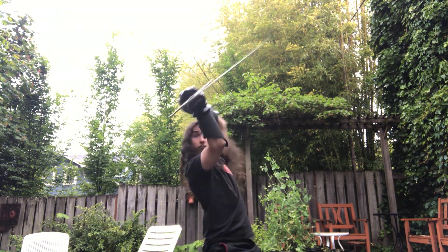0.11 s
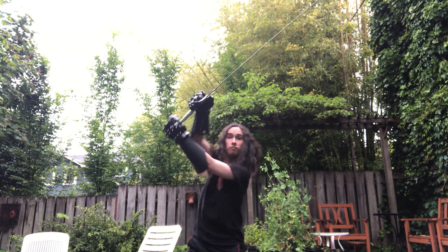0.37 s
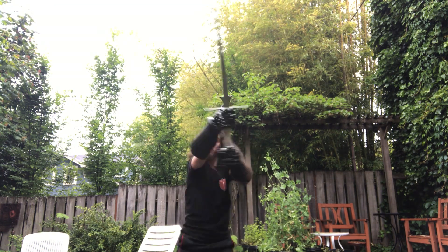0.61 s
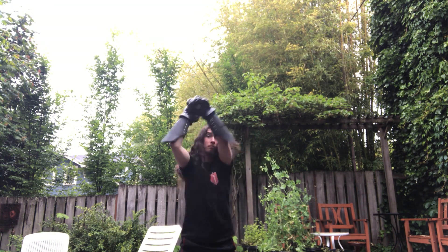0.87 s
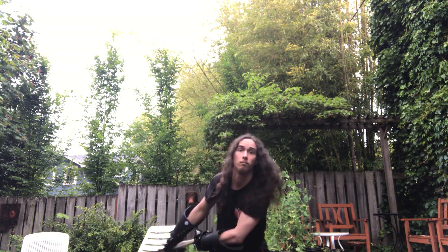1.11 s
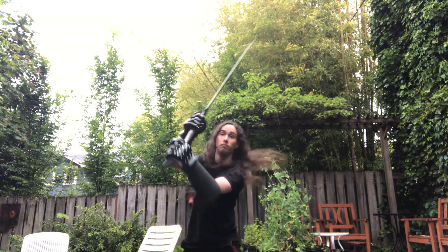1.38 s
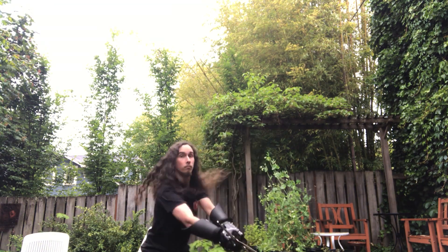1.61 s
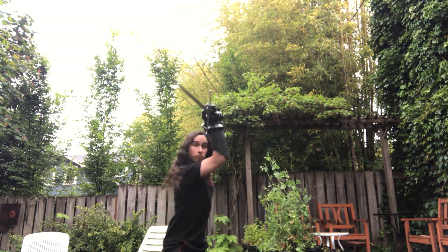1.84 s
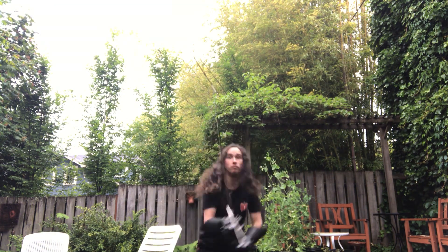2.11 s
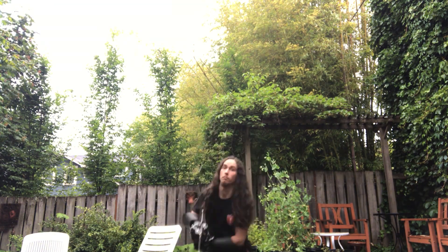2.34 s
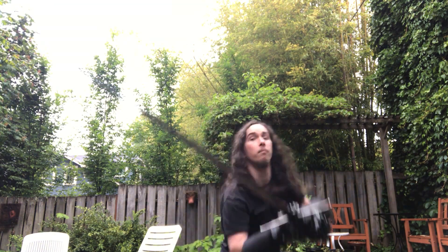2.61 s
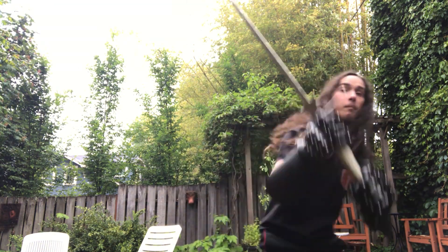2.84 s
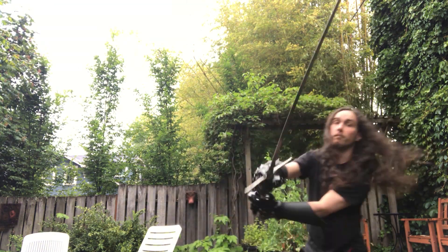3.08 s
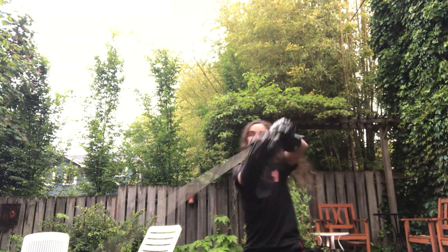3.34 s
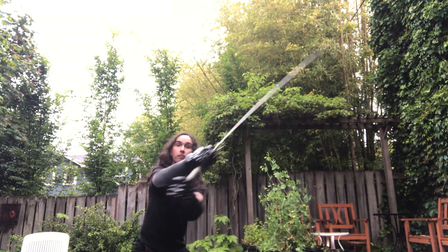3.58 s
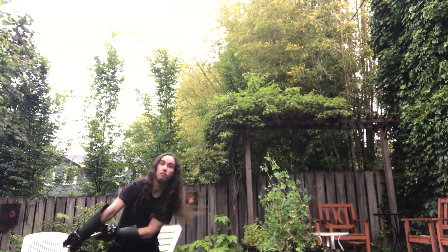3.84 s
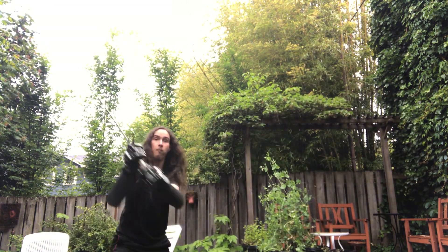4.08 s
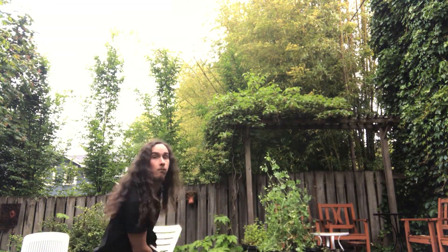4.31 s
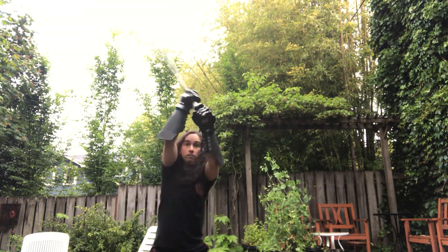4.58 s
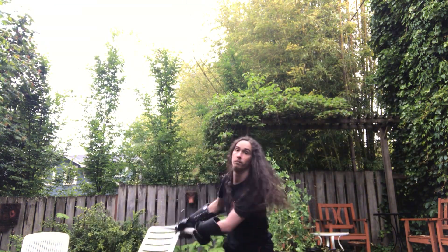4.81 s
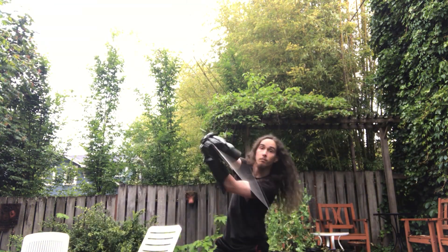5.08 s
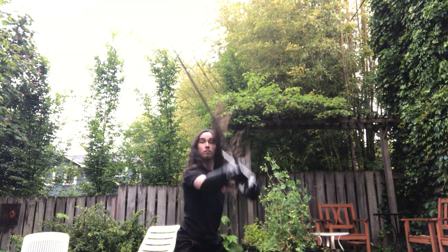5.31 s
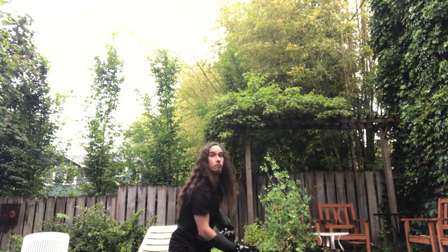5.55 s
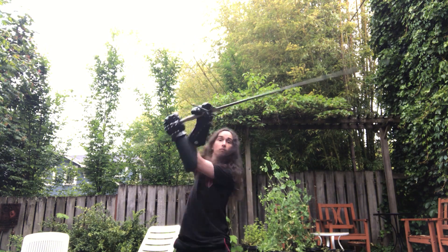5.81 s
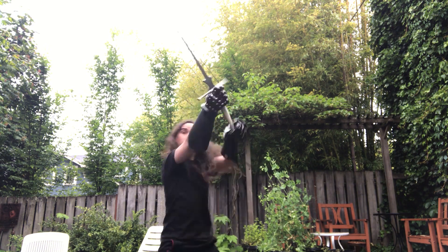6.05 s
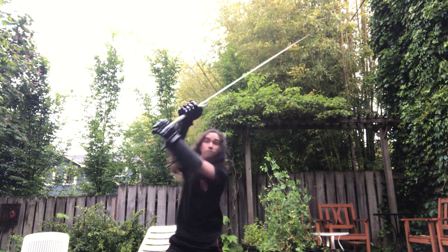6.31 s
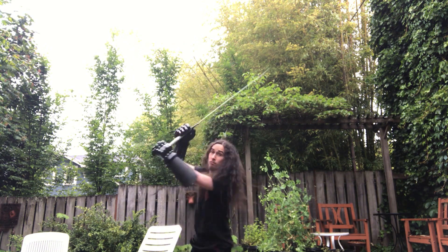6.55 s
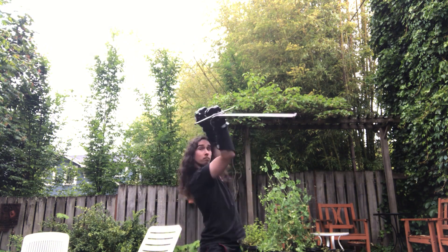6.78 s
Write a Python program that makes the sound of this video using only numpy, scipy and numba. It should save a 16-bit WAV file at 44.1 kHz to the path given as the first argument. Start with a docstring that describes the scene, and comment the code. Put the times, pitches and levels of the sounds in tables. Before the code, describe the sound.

Hard plated gloves clack and scrape in quick irregular bursts while feet crunch on gravel in a backyard, with faint distant town noise behind.

```python
"""Feet shuffle and crunch on gravel, with plates scraping and clacking, two metres from a phone, for 7 s.
From the start, swarms of tiny damped clicks crunch and scrape, with single plate snaps (short rings)
and hollow two-tone knocks. The hardest snap comes at 2.7 s, a dense run of snaps at
3.2-3.6 s, the loudest scrape with a knock at 5.9 s, a last clack at 6.8 s. Ground and fences echo
briefly; throughout lies a distant town of flickering noise, with faint sine hums from 2.1, 3.9, 5.9 s."""
import sys
import numpy as np
from scipy import signal
from scipy.fft import rfft, irfft, next_fast_len
from scipy.io import wavfile
from scipy.ndimage import uniform_filter1d
from numba import njit

SR = 44100
rng = np.random.default_rng(int(sys.argv[2]) if len(sys.argv) > 2 else 0)


def how_loud(loudness_db):
    """Turn decibels into a plain amplitude multiplier (0 dB gives 1, 20 dB gives 10)."""
    steps = np.asarray(loudness_db, float) / 20
    return 10 ** steps


def int16_out(signal):
    """Quantize to a 16-bit WAV file."""
    q = np.round(np.clip(np.atleast_2d(signal).T, -1, 1) * 32767)
    wavfile.write(sys.argv[1], SR, q.astype(np.int16))


N = 305172


def colour_db(table, f_hz):
    """Read a spectrum on a log-frequency axis."""
    table_hz, db = np.transpose(table)
    return np.interp(np.log(f_hz), np.log(table_hz), db)


@njit
def ring(count, start, f_hz, t60_s, push_s, size):
    """Sum of damped sines that build up while the push lasts and run until they have lost 50 dB."""
    out = np.zeros(count)
    for k in range(len(start)):
        turn = np.exp(2j * np.pi * f_hz[k] / SR - np.log(1000) / (t60_s[k] * SR))
        push_decay = np.exp(-1 / (push_s[k] * SR))
        z, rest = size[k] + 0j, 1.
        for i in range(start[k], min(count, start[k] + int(t60_s[k] * SR * 5 / 6) + 2)):
            out[i] += z.imag * (1 - rest)
            z *= turn
            rest *= push_decay
    return out


def strike(t_s, f_hz, t60_s, push_s, size):
    """Damped rings at times in seconds; T60 limited to 0.1-500 ms."""
    start = np.clip(t_s * SR, 0, N - 1).astype(np.int64)
    return ring(N, start, 1. * f_hz, np.clip(t60_s, 1e-4, .5), push_s + 1e-6, size)


def walk(rate_hz):
    """Random levels held 1 / rate_hz and slewed twice; spread near 1."""
    hold = int(SR / rate_hz)
    steps = np.repeat(rng.standard_normal(N // hold + 1), hold)
    return 2.34 * uniform_filter1d(uniform_filter1d(steps, hold), hold)[:N]


# restless rustle under the moves: t/s, level/dB at 4.5 kHz
RUSTLE_LEVELS = [(0, -62), (1, -63), (1.3, -70), (2.2, -65.5), (2.97, -59), (3.15, -67), (3.37, -49.5),
                 (3.6, -72), (4.15, -64.5), (4.3, -66.5), (5, -62), (5.4, -65.5), (6.0, -67), (6.34, -57.5),
                 (6.65, -66), (6.92, -58)]
# feet shuffling on gravel and plates scraping, swelling first:
# t of top/s, level/dB, tilt/(dB/octave), rise/ms, fall to -20 dB/ms
SCRAPE_MOVES = [(0.0061, -40, -0.2, 250, 19), (0.1383, -37, -3, 20, 37), (0.1954, -47, -2.5, 26, 22),
                (0.26, -47.5, 0.5, 80, 103), (0.5201, -41.5, 2.5, 68, 69), (0.5715, -48, -1, 210, 17),
                (0.7395, -34, -2, 76, 36), (0.8668, -52, 3.5, 150, 29), (0.953, -41, -0.2, 45, 34),
                (1.0943, -51, -6, 45, 64), (1.2162, -42.5, -0.5, 69, 32), (1.427, -44.5, -8, 43, 23),
                (1.5133, -48, -1.5, 202, 25), (1.7151, -42.5, -2, 31, 94), (1.7567, -39.5, 0.7, 110, 36),
                (1.8832, -54, -1.5, 10, 55), (2.176, -45, 0, 49, 10), (2.4943, -44.5, -3.5, 115, 15),
                (2.534, -50.5, -8, 21, 29), (2.6816, -37.5, -3, 85, 23), (2.9064, -50, 3.5, 52, 8),
                (3.204, -46, 1.2, 136, 44), (3.3512, -29, 0, 108, 33.5), (3.512, -39, 1, 68, 26.5),
                (3.6604, -35.5, 0.5, 54, 14), (3.6901, -43.5, 4.5, 80, 21), (3.8728, -38, -2, 49, 70),
                (3.9354, -53, 1, 21, 45), (4.0145, -46, 5.5, 46, 39), (4.2842, -54, -0.5, 73, 37),
                (4.548, -43.5, -3, 58, 24), (4.6075, -40, -2.1, 64, 22), (4.778, -50.5, -5.5, 27, 130),
                (4.812, -30.5, -3, 20, 85), (4.898, -40.5, -0.8, 170, 64), (5.0286, -44.5, -0.5, 32, 52),
                (5.1094, -43.5, 0, 34, 64), (5.1642, -50.5, -5, 130, 94), (5.51, -44, -2, 25, 39),
                (5.5805, -43, -3, 70, 20), (5.7657, -42.5, 0.5, 63, 27), (5.9213, -27.5, 0, 24, 20.5),
                (6.139, -40.5, 2, 24, 126), (6.5511, -45, -1, 160, 51), (6.69, -40, -1, 41, 39),
                (6.8679, -37, 2.1, 105, 18)]
# crunches and clacks, many contacts at once: t of top/s, level/dB, tilt/(dB/octave), fall to -20 dB/ms
CLACK_MOVES = [(0.046, -51.5, -2, 12), (0.145, -39.5, 2.5, 24), (0.4465, -46.5, -7.5, 5.5),
               (0.4998, -42.5, -4.5, 47), (0.6966, -40.5, 0.5, 28), (0.7843, -35, -2, 42),
               (1.1644, -51, -7, 42), (1.3501, -52.5, 4, 25), (1.4001, -48.5, -1.5, 43),
               (1.486, -49, 7, 59), (1.613, -36, -2.5, 38), (1.672, -31.5, 1.5, 42),
               (1.9522, -37, -1.5, 26), (2.139, -43.5, -4.5, 12.5), (2.285, -50, -3, 125),
               (2.7054, -33.5, -2.5, 39), (2.817, -49.5, 1, 30), (2.964, -46, -1, 19),
               (3.229, -42.5, -1.5, 20), (3.257, -36, 2, 37), (3.296, -43.5, 2.2, 24),
               (3.4649, -48, 1.6, 6), (3.5466, -31.5, -2.5, 37.5), (3.6357, -39.5, -1.5, 94),
               (3.725, -44, -2, 27), (3.8345, -43, -8, 23), (3.8665, -35, -4, 17), (4.219, -33.5, 1, 17),
               (4.2357, -38.5, -6.5, 18), (4.735, -37.5, -1.5, 29), (4.8271, -38, -5, 19),
               (5.051, -47, 4.5, 8), (5.204, -46, -6, 26), (5.2953, -36, 0.5, 39), (5.499, -46.5, 3, 3),
               (5.7171, -38.5, -3, 46), (5.857, -52, -5.5, 200), (6.01, -56.5, 1, 35),
               (6.0779, -44.5, -4, 18), (6.1164, -41, -1.3, 112), (6.374, -52, -4, 53),
               (6.429, -41.5, -6, 4), (6.454, -47, -6, 43), (6.844, -29, -1.9, 31)]


def contact_power(t_s, octaves):
    """Power of each click: a restless rustle that rises and sinks, plus every scrape and clack."""
    rustle_tilt_db_per_octave = -2.7
    scrape_bend, clack_bend, fall_bend = 1.36, 1.97, 1.206  # above 1: flat at the top, then steeper
    clack_rise_ms = 7.6
    rustle_db = np.interp(t_s, *np.transpose(RUSTLE_LEVELS))
    power = how_loud(rustle_db + rustle_tilt_db_per_octave * octaves) ** 2
    moves = [(scrape_bend, *row) for row in SCRAPE_MOVES]
    moves += [(clack_bend, top_s, db, tilt, clack_rise_ms, fall_ms)
              for top_s, db, tilt, fall_ms in CLACK_MOVES]
    pitch_favours = rng.standard_normal((len(moves), 16))
    for (bend, top_s, db, tilt, *ms), favours in zip(moves, pitch_favours):
        rise_s, fall_s = np.maximum(ms, 1) / 1000
        now = slice(*np.searchsorted(t_s, [top_s - rise_s, top_s + 2 * fall_s]))
        after_s = t_s[now] - top_s
        loss_db = 45 * np.maximum(-after_s / rise_s, 0) ** bend
        loss_db += 20 * np.maximum(after_s / fall_s, 0) ** fall_bend
        # clicks right at the top are slightly softer, most so after a quick rise
        loss_db += 3.5 * np.exp(-np.abs(after_s) / 0.00075 - rise_s / 0.0026)
        # each move stirs some pitches more than others
        favour_db = 3.0 * np.interp(octaves[now], np.linspace(-4, 2, 16), favours)
        power[now] += how_loud(db - loss_db + tilt * octaves[now] + favour_db) ** 2
    return power


# relative click strength over pitch: f/Hz, level/dB
CLICK_SPECTRUM = [(180, -48), (300, -37), (856, 2), (994, -2), (1190, 3), (1660, 4), (2570, 8), (5700, 7),
                  (14200, 4), (16000, 3)]


def crunches_and_scrapes():
    """Swarm of tiny damped clicks of many pitches, driven by rustle, scrapes and clacks."""
    clicks_per_s, slips_per_s, slip_fall_s = 14000, 120, 0.0044
    base_cycles, push_cycles = 9.86, 0.42  # base ring time to -60 dB, before scatter
    when, pitch, hardness, damping = rng.random((clicks_per_s * N // SR, 4)).T
    t_s = np.sort(when) * N / SR
    f_hz = 300 + 15700 * pitch ** 1.5
    octaves = np.log2(f_hz / 4500)
    power = contact_power(t_s, octaves)

    # surfaces catch and slip: each slip lifts the swarm at once and dies away in a few ms
    slips = np.minimum(rng.exponential(size=len(t_s)), 2.5)
    slips = slips * (rng.random(len(t_s)) < slips_per_s / clicks_per_s)
    stutter_db = 2 * signal.lfilter([1], [1, -np.exp(-1 / (slip_fall_s * clicks_per_s))], slips)

    # a few clicks stand above the rest; low ones ring longer, so they start smaller
    spread_db = -2.0 * np.log(1 - hardness)
    size = how_loud(-8.0 + stutter_db + spread_db + colour_db(CLICK_SPECTRUM, f_hz) + 5.2 * octaves)

    # ring times scatter from a dead tick to a short ping
    ring_cycles = base_cycles * how_loud(14.0 * (damping - .5))
    # rare clean hits ring longer and louder
    ping = damping > 1 - .012
    ring_cycles[ping] *= 2.5
    size[ping] *= how_loud(7)
    size = np.sqrt(power * base_cycles / ring_cycles) * size
    return strike(t_s, f_hz, ring_cycles / f_hz, push_cycles / f_hz, size)


# single plates snapping: t/s, relative level/dB, f/Hz
SNAP_HITS = [(0.1372, -22, 1960), (0.187, -22, 8370), (0.1957, -16.5, 8400), (0.4975, -17.5, 9300),
             (0.5058, -22.5, 1610), (0.569, -19, 8400), (0.7016, -18.5, 7000), (0.713, -21, 11800),
             (0.7348, -9.5, 6300), (0.7863, -11, 5560), (1.1246, -27.5, 8000), (1.3496, -26, 10600),
             (1.898, -24, 2800), (1.947, -23.5, 1900), (1.948, -25, 1070), (2.2825, -28.5, 3430),
             (2.2965, -26.5, 950), (2.6637, -21.5, 500), (2.673, -23, 2700), (2.7061, 0, 4870),
             (2.817, -26, 12920), (2.8963, -24.5, 1190), (2.908, -26, 8950), (3.141, -32.5, 1090),
             (3.2327, -18, 6500), (3.2534, -8, 6760), (3.268, -12, 6150), (3.3578, -10, 6910),
             (3.373, -7.5, 7040), (3.4638, -26.5, 4550), (3.49, -10.5, 10500), (3.5113, -8, 7750),
             (3.552, -28, 6850), (3.832, -22, 2560), (3.8412, -25, 1560), (4.219, -14, 7900),
             (4.6057, -30, 2750), (4.7395, -15, 3700), (4.815, -17, 1980), (4.8269, -6.5, 2330),
             (4.8552, -17, 8900), (5.048, -20.5, 4800), (5.1471, -25.5, 1700), (5.2067, -23.5, 5000),
             (5.29, -32.5, 614), (5.5764, -31, 6200), (5.7103, -34, 10100), (5.893, -31, 900),
             (5.9189, -15, 4530), (6.1524, -19.5, 2980), (6.316, -29, 10700), (6.4284, -26, 5950),
             (6.452, -23.5, 3100), (6.5297, -19, 9050)]


def snaps():
    """One hard contact: a few cycles of a single plate, more cycles at higher pitch."""
    t_s, db, f_hz = np.transpose(SNAP_HITS)
    cycles = 6.2 * (f_hz / 5000) ** 0.2  # to -60 dB
    return strike(t_s, f_hz, cycles / f_hz, 0.86 / f_hz, how_loud(db + 2.5))


# hollow knocks: t/s, level/dB of main tone, f/Hz of main tone
KNOCK_HITS = [(0.733, -35.5, 1212), (0.94, -36, 3120), (1.095, -45, 1560), (1.423, -30, 920),
              (1.4308, -38, 1020), (1.617, -30, 4600), (1.6685, -33.5, 1624), (1.678, -31, 4860),
              (1.735, -38, 1490), (1.957, -38, 3120), (1.961, -30.5, 156), (2.668, -35, 191),
              (2.674, -31.5, 318), (2.687, -45, 303), (2.706, -32.5, 556), (3.331, -26.5, 3850),
              (3.635, -40, 2240), (3.65, -37, 2250), (3.793, -43, 1600), (3.868, -29, 3090),
              (4.236, -35, 327), (4.236, -37, 987), (4.734, -34, 2560), (4.826, -30, 1570),
              (4.851, -33, 1170), (5.917, -21.5, 1336), (5.917, -38, 338), (6.073, -42.5, 666),
              (6.15, -40.5, 740), (6.275, -44, 1470), (6.373, -39.5, 1460), (6.451, -37, 3040),
              (6.842, -27, 2490)]


def knocks():
    """Hollow knocks and short pings: a main pitch and a weaker, shorter one above it."""
    t_s, db, f_hz = np.transpose(KNOCK_HITS)
    t60_s = 0.026 * (f_hz / 1000) ** -0.22
    push_s = 0.77 / f_hz
    main = strike(t_s, f_hz, t60_s, push_s, how_loud(db))
    upper = strike(t_s, 1.464 * f_hz, 0.88 * t60_s, push_s, how_loud(db - 7.5))
    return main + upper


def strays():
    """Faint lone ticks at any moment: short damped rings of random pitch."""
    ticks_per_s = 22
    when, pitch, hardness = rng.random((ticks_per_s * N // SR, 3)).T
    f_hz = 900 * 2 ** (3.5 * pitch)
    size = how_loud(-45. - 2.5 * np.log(1 - hardness))
    return strike(when * N / SR, f_hz, 8.3 / f_hz, 0.85 / f_hz, size)


# reflections from ground and fences: delay/s, level/dB
ECHO_PATHS = [(.0042, -32), (0.01, -26.5), (.019, -31), (.031, -23)]


def echoes(near):
    """Delayed, weaker copies of the near sound."""
    out = np.zeros(N)
    for delay_s, db in ECHO_PATHS:
        lag = int(delay_s * SR)
        out[lag:] += how_loud(db) * near[:-lag]
    return out


# relative town spectrum: f/Hz, level/dB
TOWN_SPECTRUM = [(18, -64), (30, -50), (115, 0.5), (165, 3.5), (554, -8), (1160, -13), (1540, -10),
                 (2010, -14.5), (2900, -11), (6380, -27.5), (10800, -25), (14800, -31), (16000, -13.5)]


def town():
    """Distant traffic and leaves: noise in octave bands that flicker on their own."""
    rms_db = -58
    size = next_fast_len(N)
    f_hz = np.maximum(np.arange(size // 2 + 1) * SR / size, 1)
    spectrum = rfft(rng.standard_normal(size)) * how_loud(colour_db(TOWN_SPECTRUM, f_hz))
    out = 0
    for centre in range(4, 15):  # log2 of 16 Hz to 16 kHz
        share = np.maximum(1 - np.abs(np.log2(f_hz) - centre), 0)
        flicker_db = 0.7 * walk(3.08) + 0.8 * walk(11)
        out = out + irfft(spectrum * share, size)[:N] * how_loud(flicker_db)
    return out * how_loud(rms_db) / np.std(out)


# faint far-off hums that swell and fade: start t/s, length/s, f/Hz, level/dB
HUM_TONES = [(2.1, 0.96, 464, -70), (3.9, 0.54, 393, -67.5), (5.898, 1, 245.2, -66.5)]


def hums():
    """Soft, slightly wavering sines under the town noise."""
    t_s, out = np.arange(N) / SR, 0
    for start_s, length_s, f_hz, db in HUM_TONES:
        swell = np.sin(np.pi * np.clip((t_s - start_s) / length_s, 0, 1)) ** .5
        wavering_hz = f_hz * (1 + 0.00616 * walk(6))
        out = out + how_loud(db) * swell * np.sin(2 * np.pi * np.cumsum(wavering_hz) / SR)
    return out


def scene():
    """Feet on gravel and plates with the echoes of ground and fences, over the town."""
    near = crunches_and_scrapes() + snaps() + strays() + knocks()
    # the phone's bass cut keeps the deep part of the knocks away
    bass_cut = signal.butter(3, 120, "high", fs=SR, output="sos")
    near = signal.sosfilt(bass_cut, near + echoes(near))
    return (near + town() + hums())[None]


def roll_off(x):
    """The treble ends steeply here."""
    return signal.sosfilt(signal.butter(12, 16630, fs=SR, output="sos"), x)


def record(dry):
    """The phone cuts the very top with a steep low-pass."""
    top_hz, ripple_db, stop_db = 15700, .2, 45
    top_cut = signal.ellip(8, ripple_db, stop_db, top_hz, fs=SR, output="sos")
    mix = signal.sosfilt(top_cut, dry)
    return roll_off(mix)


dry = scene()
out = record(dry)
int16_out(out)
```